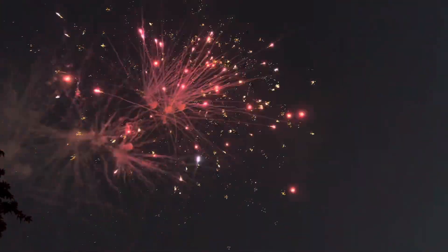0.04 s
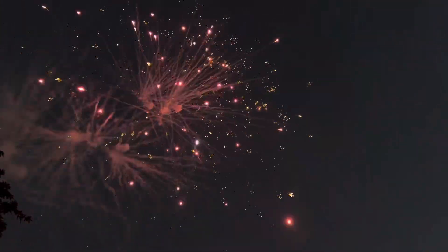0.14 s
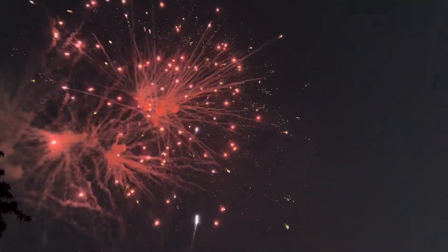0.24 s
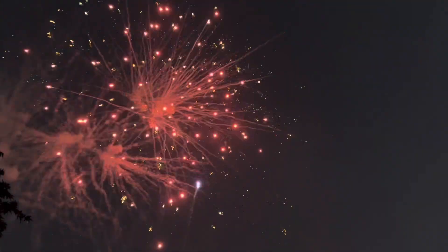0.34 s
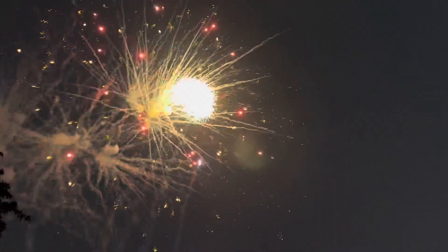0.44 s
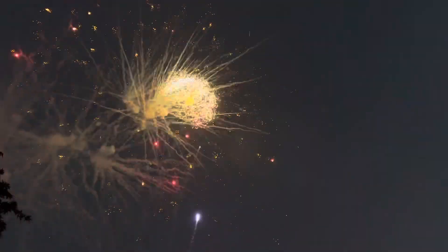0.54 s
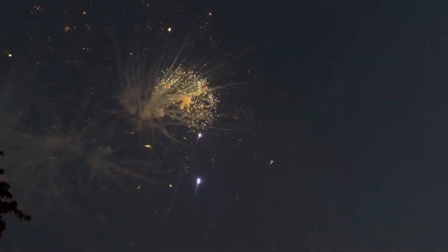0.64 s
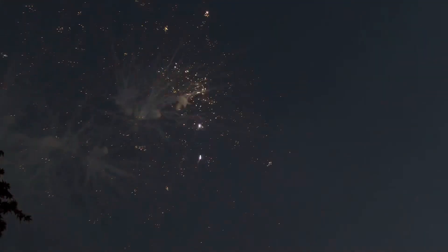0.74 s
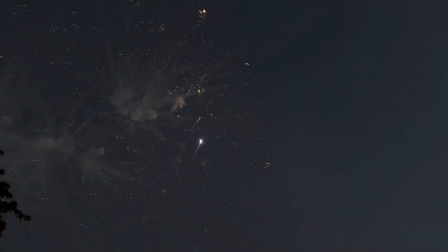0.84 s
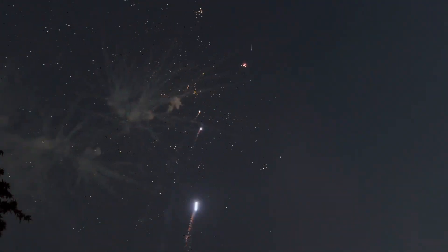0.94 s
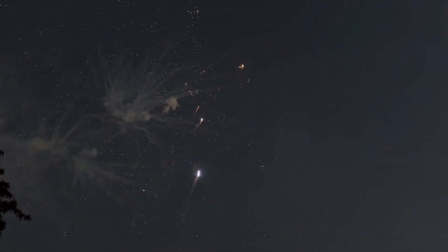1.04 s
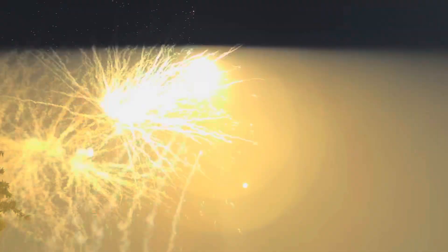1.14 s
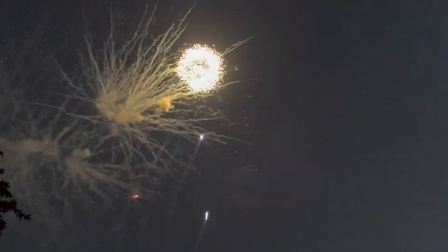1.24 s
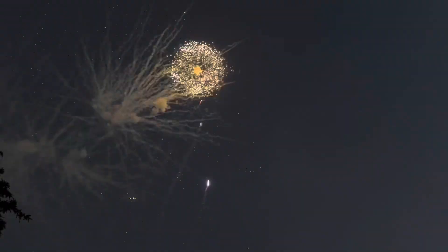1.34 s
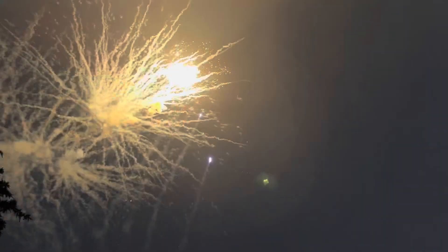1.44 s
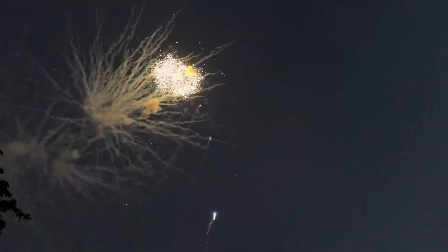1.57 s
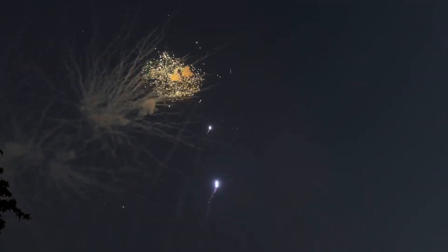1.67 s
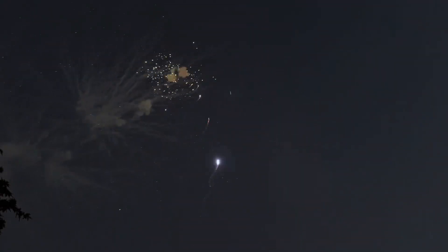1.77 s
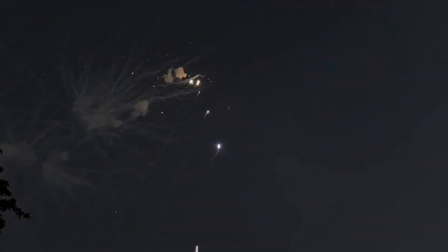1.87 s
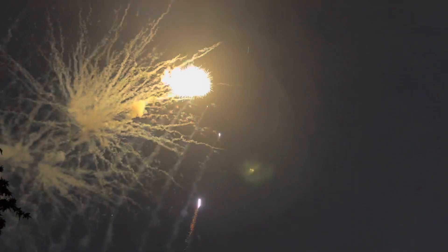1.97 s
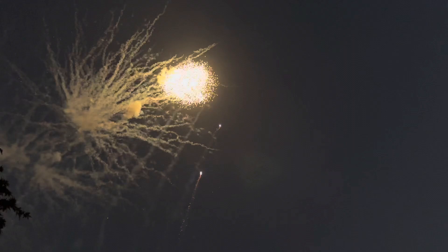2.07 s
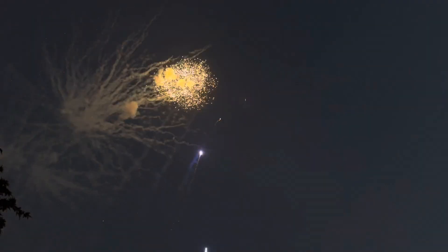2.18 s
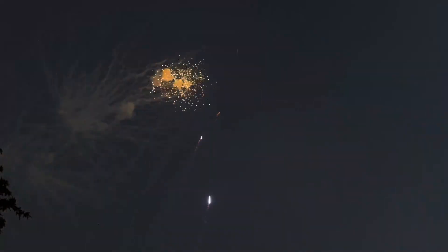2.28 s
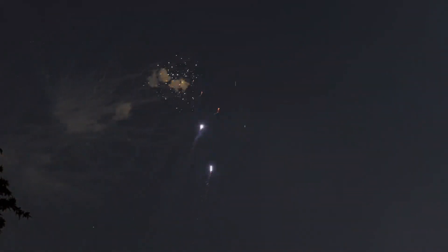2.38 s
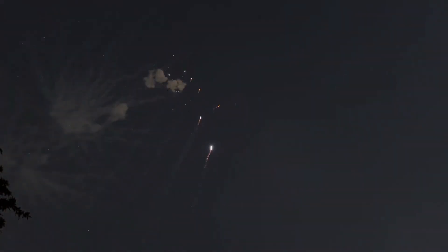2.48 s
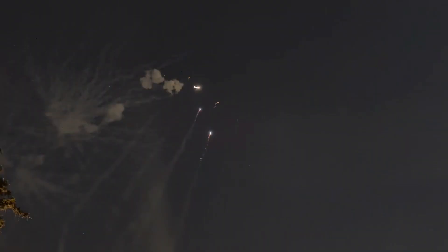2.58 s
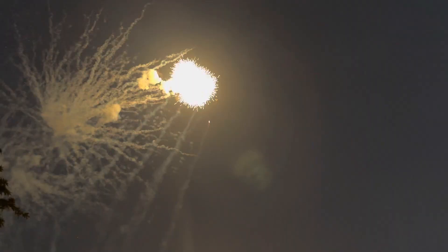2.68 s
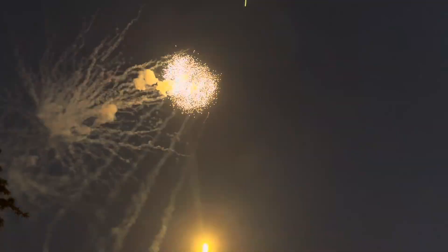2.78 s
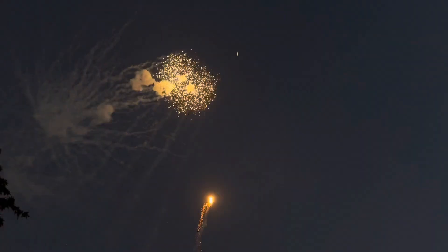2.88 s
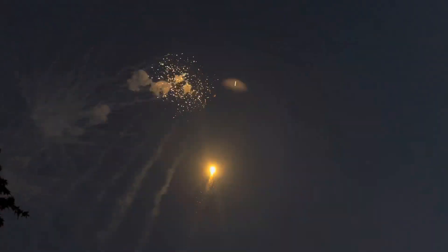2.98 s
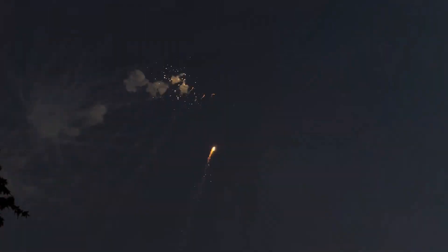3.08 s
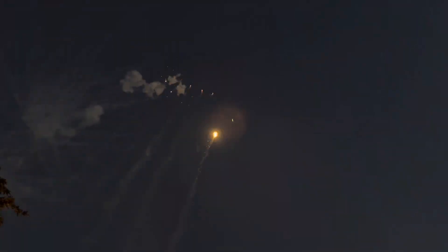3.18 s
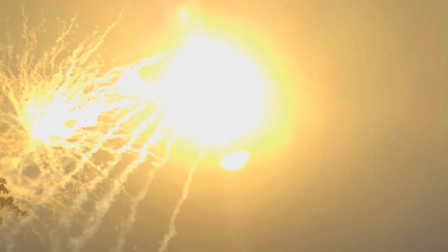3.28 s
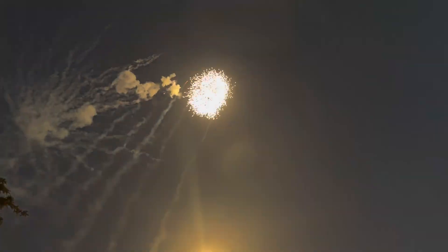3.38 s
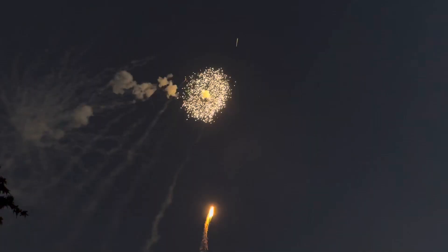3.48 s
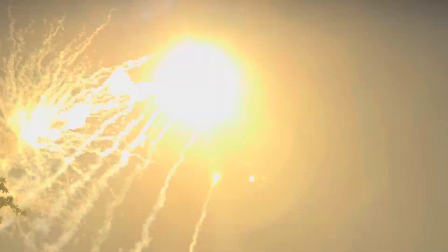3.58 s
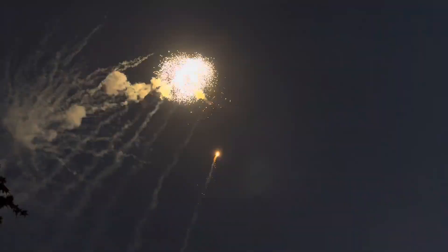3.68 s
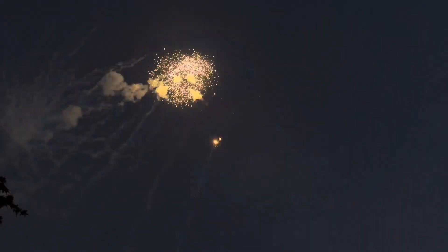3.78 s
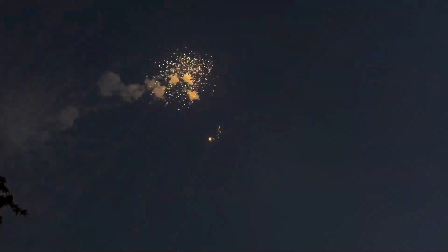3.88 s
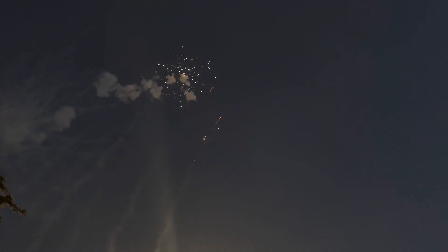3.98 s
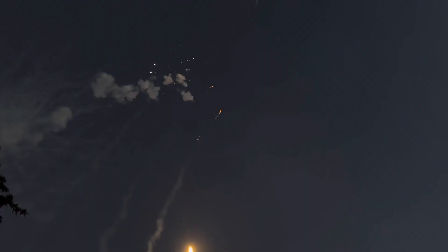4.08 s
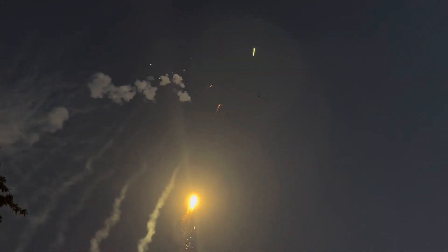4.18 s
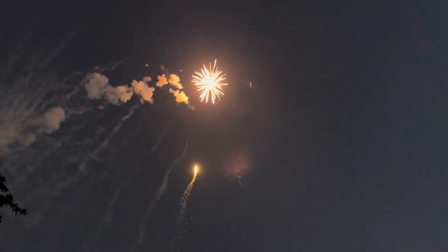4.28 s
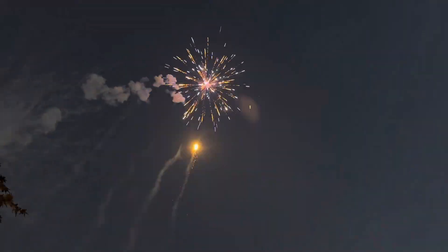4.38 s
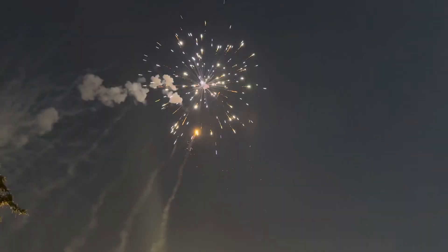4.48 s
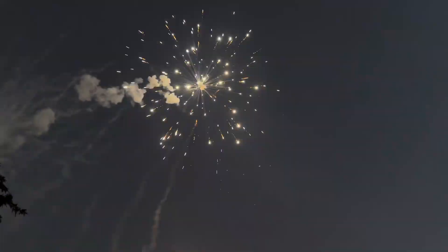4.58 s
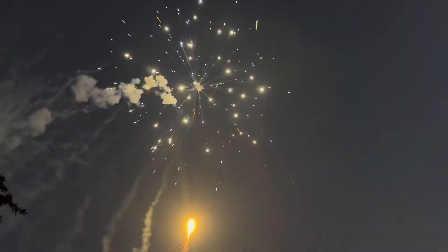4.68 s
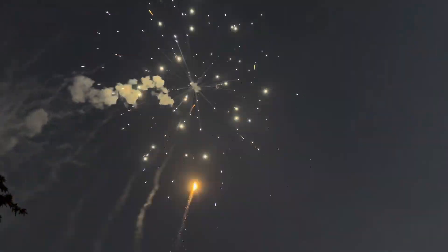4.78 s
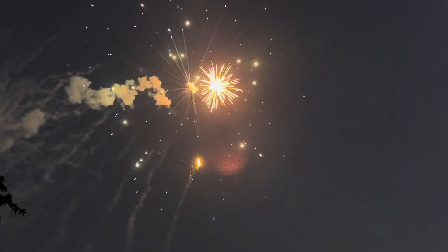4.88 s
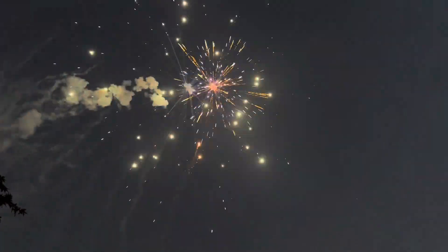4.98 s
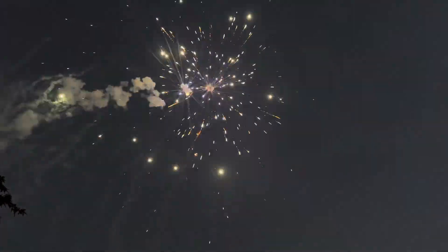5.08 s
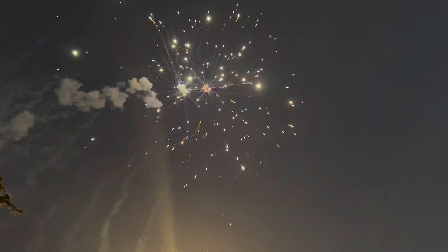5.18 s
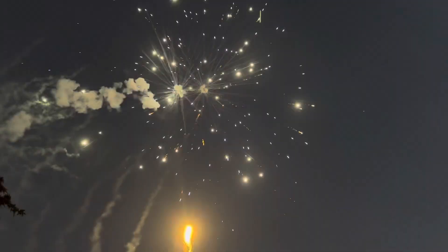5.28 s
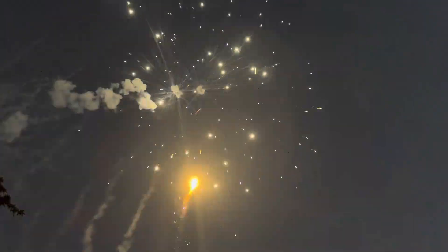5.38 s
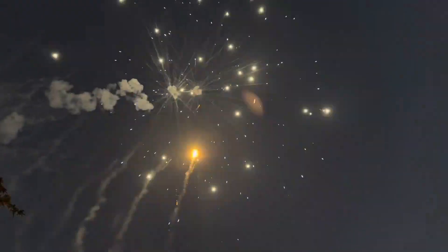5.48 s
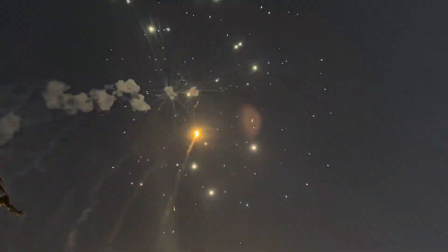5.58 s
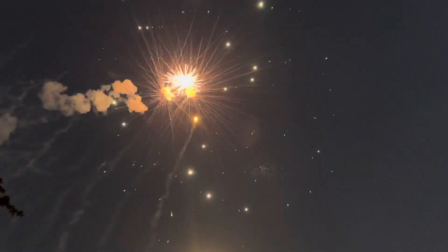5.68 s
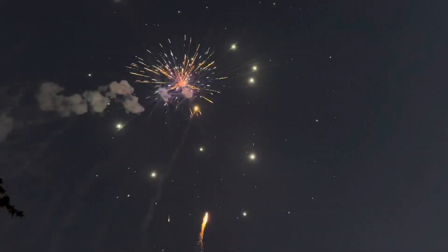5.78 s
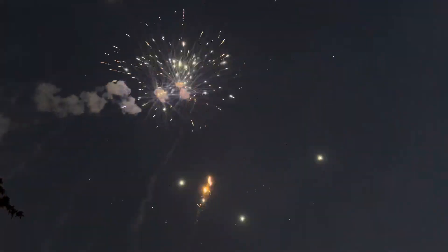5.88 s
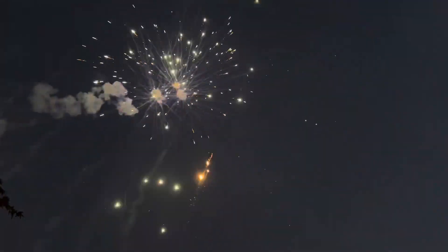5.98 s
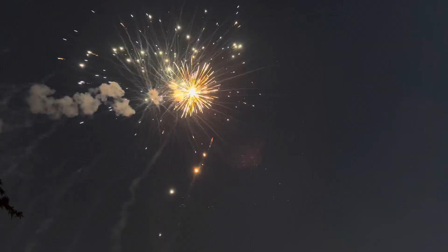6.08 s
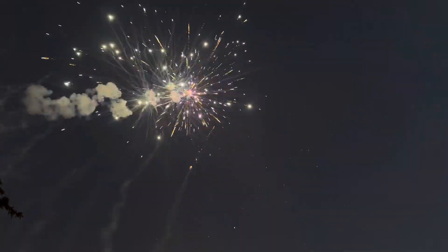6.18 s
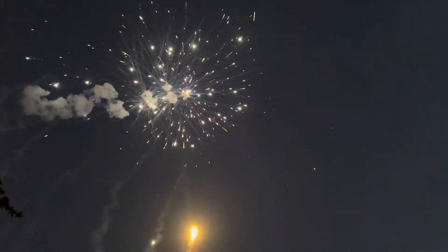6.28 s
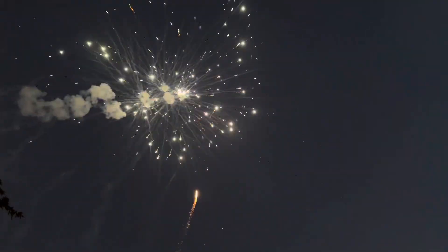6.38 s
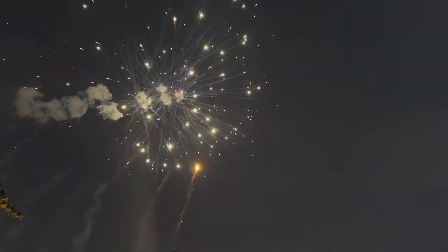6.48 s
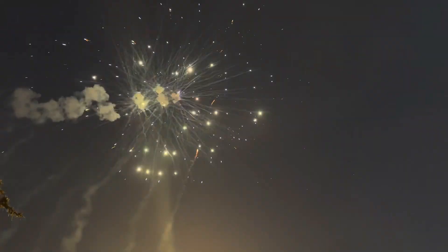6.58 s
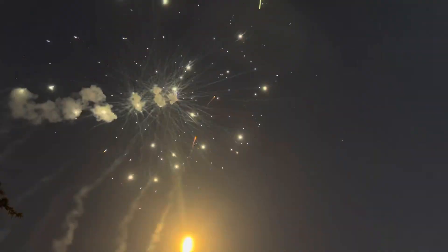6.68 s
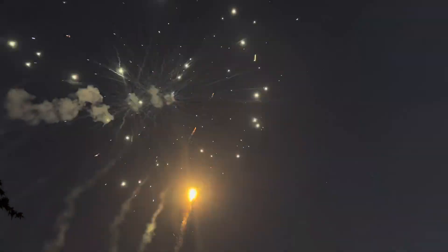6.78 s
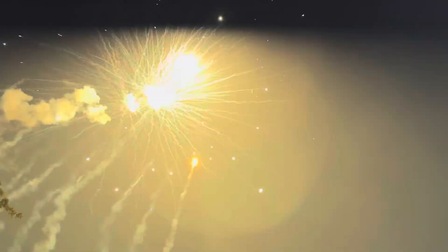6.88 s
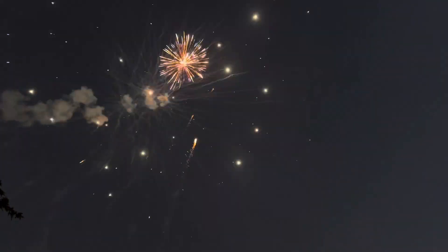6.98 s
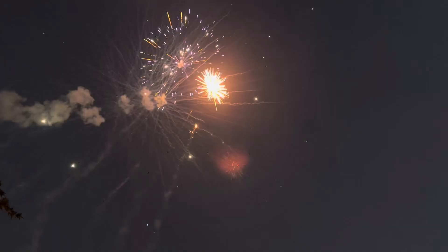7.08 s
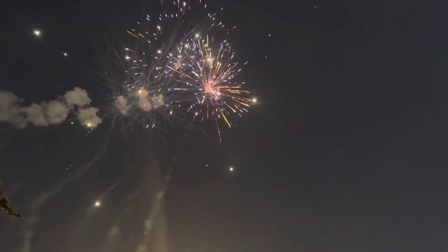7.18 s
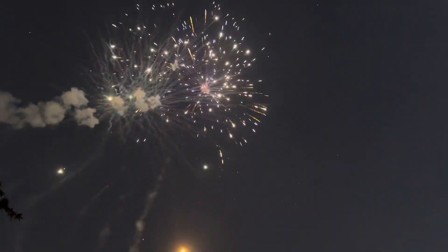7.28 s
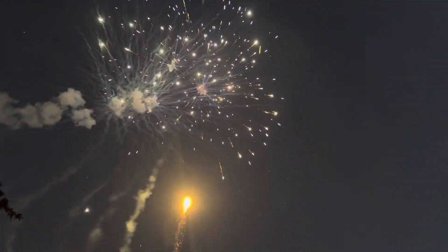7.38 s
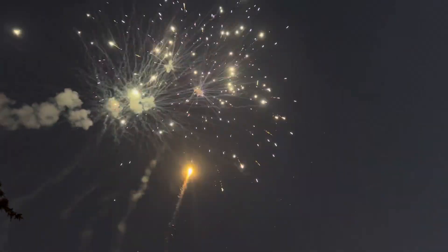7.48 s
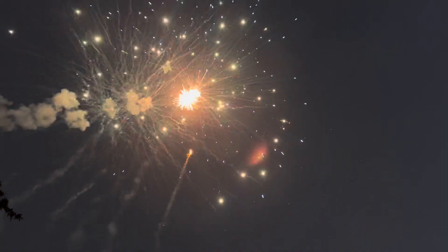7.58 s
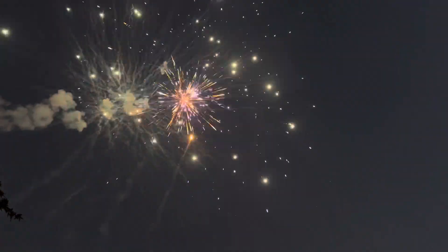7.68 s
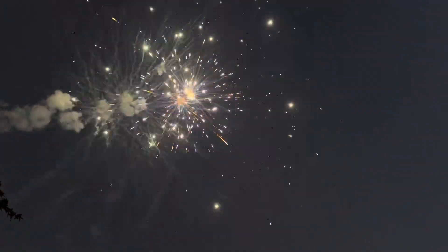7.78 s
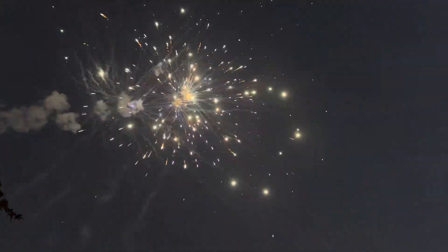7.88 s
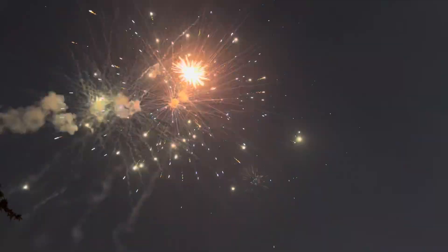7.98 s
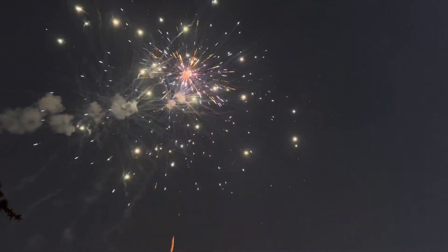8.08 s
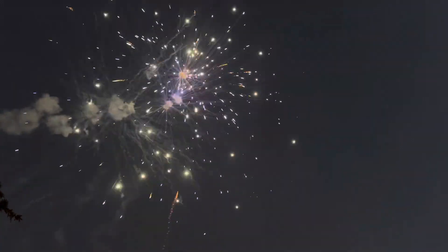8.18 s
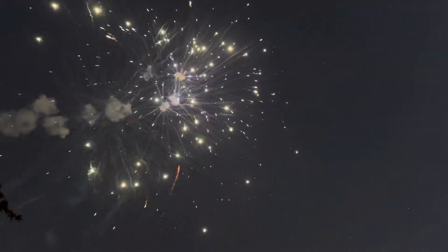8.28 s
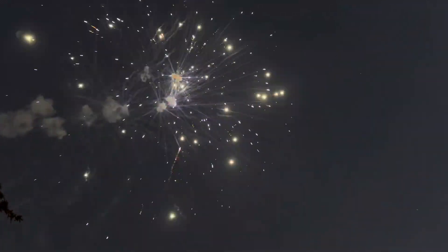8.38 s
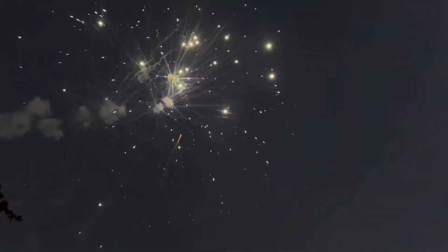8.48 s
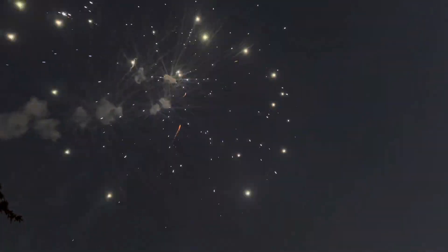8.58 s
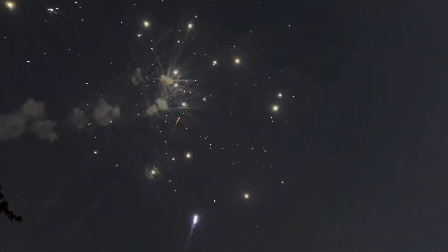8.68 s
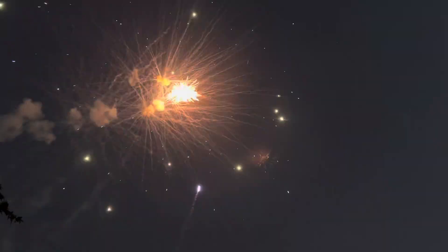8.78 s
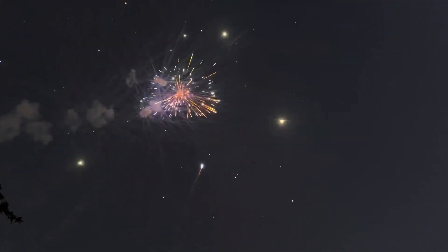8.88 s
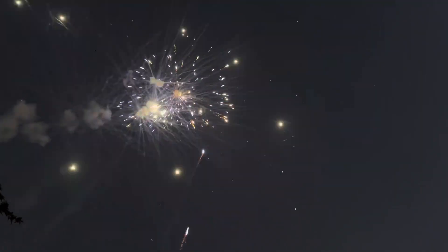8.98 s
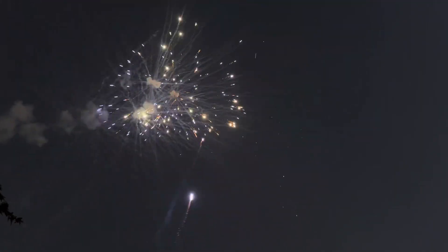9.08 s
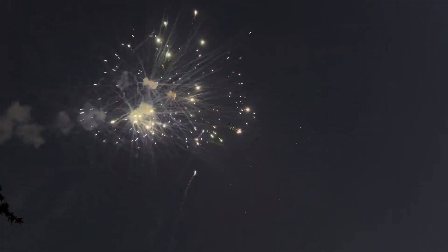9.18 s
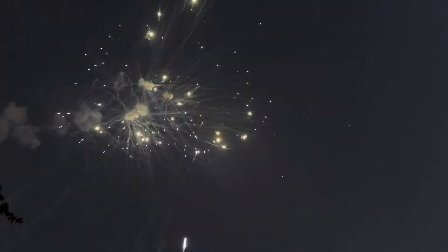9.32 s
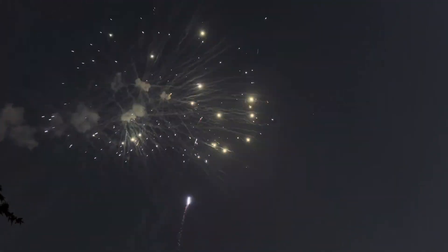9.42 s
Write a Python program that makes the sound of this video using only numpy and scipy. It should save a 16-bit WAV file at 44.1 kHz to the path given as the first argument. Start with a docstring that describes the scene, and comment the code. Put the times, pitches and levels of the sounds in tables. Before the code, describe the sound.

A firework cake fires throughout, outdoors and near a phone microphone. Sharp, ringing launch cracks come from the ground ahead roughly every half second, from the start until about 9.3 seconds. Between them, shells burst overhead and to the left with rounder, raspy booms, doubling up around 0.4, 2.1, 2.8 and 3.7 seconds. A wide cloud of tiny crackles swells after the burst at 0.5 seconds; softer clouds follow from 1.3 to about 4 seconds. The middle stretch is mostly plain cracks and booms, then light crackling returns from 7.7 to about 8.7 seconds. The last boom lands near 8.9 seconds. Faint hollow pops appear around 1.1, 4.8 and 7.6 seconds. Ground and walls throw back quick echoes with a tail of about a second, and each blast is smeared into a slight falling chirp. A faint, steady, low town hum lies underneath.

```python
"""A firework cake fires shell after shell over the murmur of a quiet town, near a phone held up to the sky.
Lift charges crack on the ground ahead, with faint hollow pops between them. The shells boom overhead and
to the left, and some leave a cloud of crackling stars. Ground and walls throw the blasts back.
The phone splits the sound into bands, which smears every blast into a falling chirp."""
import sys
import numpy as np
from scipy import signal
from scipy.fft import rfft, irfft, next_fast_len
from scipy.io import wavfile
from scipy.ndimage import uniform_filter1d

SR = 44100
rng = np.random.default_rng(int(sys.argv[2]) if len(sys.argv) > 2 else 0)


def master_out(mix):
    """Clip the mix to full scale and print it as 16-bit PCM to the path in sys.argv[1]."""
    frames = np.transpose(np.atleast_2d(mix))
    ceiling = np.clip(frames, -1, 1)
    pcm = np.round(ceiling * 32767).astype(np.int16)
    wavfile.write(sys.argv[1], SR, pcm)


N = 416744
SWELL_MS = 2  # room for the hiss that runs ahead of a pressure jump


def gain_of(db):
    """Decibels to gain."""
    return 10 ** (np.asarray(db) / 20)


def curve_at(points, hz):
    """Reads a curve on a log-frequency axis."""
    f, value = np.transpose(points)
    return np.interp(np.log(hz + 1), np.log(f + 1), value)


def diffuse_noise(size, shape):
    """Stereo noise of unit energy, partly alike on both sides; shape(hz, seconds) is its magnitude."""
    # Stereo width. Each row: frequency in Hz, left-right likeness from 0 to 1.
    likeness = [(60, 0.99), (250, 0.74), (600, 0.047), (2000, 0.47), (6000, 0.1), (13000, 0.27)]
    frames, hz = size // 128 + 5, np.fft.rfftfreq(512, 1 / SR)[:, None]
    a, b, c, d = rng.standard_normal((frames, 257, 4)).T
    same, left = np.clip(curve_at(likeness, hz), 0, 1), a + 1j * b
    spectra = np.array([left, same * left + np.sqrt(1 - same ** 2) * (c + 1j * d)])
    spectra *= shape(hz, np.arange(frames) * 128 / SR)
    out = signal.istft(spectra, nperseg=512, noverlap=384)[1][:, :size]
    return out / np.linalg.norm(out, axis=1).mean()


def town_murmur(level_db):
    """The steady, low bed of the town at night."""
    # Tone of the murmur. Each row: frequency in Hz, relative level in dB.
    spectrum = [(18, -40), (30, -7), (82, 2), (333, -2), (397, 3), (978, -6), (1230, -13.5), (5250, -20),
                (12000, -36.5), (15600, -77), (22000, -120)]
    return gain_of(level_db) * np.sqrt(N) * diffuse_noise(N, lambda hz, s: gain_of(curve_at(spectrum, hz)))


def blast(push_ms, soft_ms):
    """A pressure jump, its fall and the suction behind it; the air rounds the jump."""
    ms = np.arange(1500) / SR * 1000
    pole = np.exp(-1000 / (SR * soft_ms))
    return signal.lfilter([1 - pole], [1, -pole], (1 - ms / push_ms) * np.exp(-ms / push_ms))


def crack(ring, ragged_db, front_ms, rise_ms, fall_ms, bright):
    """Ragged gas noise that swells up to the jump and dies after it, plus what the jump sets ringing."""
    t = np.arange(1500) / SR - front_ms / 1000
    envelope = np.exp(np.where(t < 0, 1000 * t / rise_ms, -1000 * t / fall_ms))
    out = gain_of(ragged_db) * envelope * signal.lfilter([1, -bright], 1, rng.standard_normal(len(t)))
    for hz, db, t60 in ring:
        phase = 2 * np.pi * hz * (1 + 0.067 * rng.standard_normal()) * t
        ring_db = db + 1.7 * rng.standard_normal() - 60 * np.maximum(t, 0) / t60
        out += (t >= 0) * gain_of(ring_db) * np.sin(phase)
    return out


def reverb_tail(near_db, far_db, slaps_db, bass_hz, rise_ms=6.74):
    """Lumpy returns from near walls, too small to throw back deep bass, and smooth ones from far off."""
    # Decay of near walls and of the wider neighbourhood. Each row: frequency in Hz, t60 in seconds.
    near_t60 = [(60, 0.43), (160, 0.12), (420, 0.19), (1100, 0.23), (3000, 0.28), (8000, 0.27),
                (15000, 0.15)]
    far_t60 = [(60, 1.6), (200, 0.73), (600, 1.09), (2000, 1.03), (6000, 0.86), (15000, 0.53)]
    t = np.arange(SR) / SR
    near = diffuse_noise(
        SR, lambda hz, s: gain_of(-60 * s / curve_at(near_t60, hz)) * hz ** 2 / (hz ** 2 + bass_hz ** 2))
    far = diffuse_noise(SR, lambda hz, s: gain_of(-60 * s / curve_at(far_t60, hz)))
    lumps = uniform_filter1d(uniform_filter1d(rng.standard_normal(SR), size=90), size=90)
    near *= gain_of(slaps_db * lumps / lumps.std())
    return (gain_of(near_db) * near + gain_of(far_db) * far) * (1 - np.exp(-1000 * t / rise_ms)) ** 2


def shots(rows, echoes, tails, snap, right_late_ms, front_ms, soft_ms, dull_db, spike_db, scatter, smear):
    """Blasts with slap echoes; successive shots take turns among the tails to vary the ring-out."""
    preroll = SR // 2
    size, front = next_fast_len(N + preroll + SR), round((front_ms + SWELL_MS) * SR / 1000)
    out, sends = np.zeros((2, size)), np.zeros((len(tails), 1, size))
    for k, (s, blast_db, crack_db, push_ms, wet_db) in enumerate(rows):
        push = gain_of(blast_db) * blast(push_ms, soft_ms)
        low = np.r_[np.zeros(front), push[:-front]]
        shared, *own = (snap(front_ms + SWELL_MS) for _ in range(3))
        high = gain_of(crack_db) * (shared + np.array(own))  # each microphone port hears its own crack
        echo = uniform_filter1d(low, size=smear) + gain_of(dull_db) * high  # rough walls scatter treble
        at = round((s - SWELL_MS / 1000) * SR) + preroll
        stretches = 1 + scatter * rng.standard_normal(len(echoes) + 1)
        for (delay_ms, *side_db), stretch in zip([(0, 0, 0)] + echoes, stretches):
            wave = echo if delay_ms > 3 else low + high
            for ear in range(2):
                start = at + max(round((delay_ms * stretch + ear * right_late_ms) * SR / 1000), 0)
                out[ear, start:start + len(low)] += gain_of(side_db[ear]) * wave[ear]
        send = sends[k % len(tails), 0]
        send[at:at + len(low)] += gain_of(wet_db) * low
        send[at + front] += gain_of(wet_db + crack_db + spike_db)  # the crack, smeared into even treble
    out += irfft((rfft(sends) * rfft(tails, size)).sum(0), size)
    return out[:, preroll:preroll + N]


def lift_charges(tails, push_ms=0.81, wet_db=1.58):
    """Charges on the ground launch the shells with a sharp, ringing crack."""
    # Launches, the first just before the start. Each row: start in seconds, blast and crack levels in dB.
    launches = [(-0.08, -3.5, -16), (0.2396, -0.5, -12.5), (0.6071, -7.5, -11), (0.9132, -1.5, -12),
                (1.2257, -3, -12.5), (1.948, -2, -11), (2.5276, -3.5, -11.5), (3.163, -2.5, -12.5),
                (3.8482, -4.5, -13.5), (4.3943, -1, -12.5), (5.0485, -5.5, -10), (5.4876, -5, -10.5),
                (5.9822, -4.5, -11), (6.4234, -4, -9.5), (7.0436, -2.5, -11.5), (7.8284, -0.5, -11.5),
                (8.3314, -2, -12), (8.662, -4, -11), (9.0121, -3.5, -11.5), (9.3063, -1, -12)]
    # Ring of the crack. Each row: pitch in Hz, level in dB, t60 in seconds.
    ring = [(2570, -17.5, 0.013), (4130, -6, 0.0093), (6560, -14, 0.016), (8570, -3.5, 0.0058)]
    # Slap echoes. Each row: delay in ms, left and right levels in dB.
    echoes = [(0.978, -7, -7.5), (1.878, -14, -10), (11.34, -12.5, -13.5), (13, -16, -11.5),
              (20.53, -5, -4.5), (21.49, -10, -10.5), (23.55, -8.5, -11.5), (32.1, -28, -21.5),
              (37, -15.5, -21), (43.94, -20.5, -21)]
    rows = [(s, blast_db, crack_db, push_ms, wet_db) for s, blast_db, crack_db in launches]
    return shots(rows, echoes, tails,
                 lambda front_ms: crack(ring, 0.17, front_ms, rise_ms=1.0, fall_ms=0.95, bright=0.44),
                 right_late_ms=0.014, front_ms=0.9, soft_ms=0.011,
                 dull_db=-21.5, spike_db=11.5, scatter=0.0066, smear=3)


def hollow_pops(tail, wet_db, ring_cycles=5.6, upper_hz=2200):
    """Each faint pop is a click, a few hollow cycles at its own pitch and a brief higher ring."""
    # Pops between the shots. Each row: start in seconds, ring level in dB, pitch in Hz, click level in dB.
    pops = [(0.2193, -27.5, 1500, -38), (1.116, -24.5, 880, -52), (1.148, -45, 1160, -37),
            (4.74, -39, 1300, -58), (4.790, -27.5, 750, -51.5), (4.892, -40, 950, -68),
            (6.687, -34, 1150, -54), (7.5785, -36, 900, -58.5), (7.627, -20.5, 750, -52),
            (7.653, -21, 620, -45), (7.665, -25, 153, -50), (8.5747, -31, 1000, -35)]
    dry = np.zeros(N + SR)
    for s, level_db, hz, click_db in pops:
        ring = [(hz, level_db, ring_cycles / hz), (upper_hz, level_db - 6, 0.004)]
        pop = crack(ring, click_db, SWELL_MS, rise_ms=0.3, fall_ms=1.2, bright=0.2)
        at = round((s - SWELL_MS / 1000) * SR)
        dry[at:at + len(pop)] += pop
    return dry[:N] + gain_of(wet_db) * signal.oaconvolve(dry[None], tail, axes=1)[:, :N]


def shell_bursts(tails, crack_db=-21.5):
    """Shells explode overhead and to the left: a rounder boom with a longer rasp of gas."""
    # Bursts. Each row: start in seconds, blast level in dB, push length in ms, reverb send in dB.
    bursts = [(0.37, 2.1, 0.71, -3.5), (0.387, -2.5, 0.64, -18.5), (0.5488, 4, 1.1, -0.4),
              (1.3258, 4, 1.2, -1), (1.6106, 1.5, 1.08, 2.1), (2.118, 3, 1.07, 0.9),
              (2.1398, 2.5, 1.27, -6.5), (2.802, 4, 0.93, -1), (2.828, 3, 1.16, -6),
              (3.4456, 2.5, 1.18, -0.5), (3.7373, 4, 1, -2), (3.7649, 3.5, 1.14, -3),
              (4.4124, 3.5, 0.81, -7.5), (5.007, 4.5, 0.77, -6), (5.8283, 3, 0.91, -5.5),
              (6.1886, 3.5, 0.91, -4.3), (7.0932, 2, 0.84, -5.5), (7.21, 3.5, 0.88, -4),
              (7.7217, 3, 0.87, -2.5), (8.1009, 2.5, 0.91, -1.5), (8.9156, 3, 0.94, -4)]
    # Slaps off ground and walls. Each row: delay in ms, left and right levels in dB.
    echoes = [(1.1, -21, -21), (3.42, -56, -7), (7.54, -3, -7), (9.25, -12.5, -5.5), (14.4, -9, -10),
              (22.05, -27, -10.5), (28.24, -17, -22), (35.7, -22, -20), (48.6, -25, -18.5)]
    rows = [(s, blast_db, crack_db, push_ms, wet_db) for s, blast_db, push_ms, wet_db in bursts]
    return shots(rows, echoes, tails,
                 lambda front_ms: crack([], 2.7, front_ms, rise_ms=1.0, fall_ms=3.6, bright=0.067),
                 right_late_ms=0.24, front_ms=0.94, soft_ms=0.037,
                 dull_db=-3, spike_db=26.5, scatter=0.013, smear=11)


def crackling_stars(per_s, spread_db, push_ms, peak_after_s):
    """Thousands of tiny snaps all over the sky, a few of them larger; each cloud swells and dies away."""
    # Clouds of stars. Each row: start in seconds, level at the top of the swell in dB.
    clouds = [(.55, -40.5), (1.329, -53.5), (1.61, -64), (2.12, -54.5), (2.8, -52), (3.45, -56.5),
              (7.72, -50), (8.1, -57)]
    strength = gain_of(spread_db * np.minimum(rng.exponential(1, (N, 2)).T, 4))
    hits = strength * (rng.random((N, 2)).T < per_s / SR)
    snap = blast(push_ms, soft_ms=0.015)[None, :200]
    snaps = signal.oaconvolve(hits + 0.047 * hits[::-1], snap, axes=1)[:, :N]
    level = np.zeros(N)
    for s, top_db in clouds:
        age = np.maximum(np.arange(N) / SR - s, 0) / peak_after_s
        level += gain_of(top_db) * age * np.exp(1 - age)
    return level * snaps / snaps.std()


def scene():
    """Mixes the fireworks over the town; the reverb of a burst overhead holds less bass."""
    ground = np.array([reverb_tail(near_db=2.5, far_db=-11, slaps_db=1.5, bass_hz=60) for _ in range(2)])
    sky = np.array([reverb_tail(near_db=0.5, far_db=-8, slaps_db=3.5, bass_hz=170) for _ in range(3)])
    return (lift_charges(ground) + shell_bursts(sky) + hollow_pops(ground[0], wet_db=-4.5)
            + crackling_stars(per_s=2200, spread_db=3, push_ms=0.14, peak_after_s=0.23)
            + town_murmur(level_db=-56.5))


def record(dry):
    """The phone: microphone colour, rumble filter, band splitting, soft ceiling, band limit."""
    # Microphone colour. Each row: frequency in Hz, gain in dB.
    mic_eq = [(30, 4.5), (60, 9), (150, 3), (230, 6), (320, 5), (410, 5), (520, 1), (1200, 3), (1600, 2.5),
              (2700, 2), (4200, -1), (5400, -2.5), (6400, -1), (7500, -6.5), (9200, -2.5), (10200, -8.5),
              (10800, -26.5), (12200, -18), (13000, -10), (15400, -8.5), (16300, -23.5)]
    # The phone's band splits, each a frequency in Hz.
    crossovers = [81, 169, 303, 921, 4012]
    rumble_hz, top_hz, ceiling = 41, 16500, 1.2
    size, damping = 16384, np.sqrt(2)
    log_gain = np.log(gain_of(curve_at(mic_eq, abs(np.fft.fftfreq(size, 1 / SR)))))
    colour = np.exp(log_gain - 1j * signal.hilbert(log_gain).imag)[:size // 2 + 1]  # minimum phase
    hz = np.fft.rfftfreq(size, 1 / SR)
    s = 1j * hz / rumble_hz
    colour *= s * s / (s * s + damping * s + 1)
    for split_hz in crossovers:  # each split turns the phase once round: the bass arrives late
        s = 1j * hz / split_hz
        colour *= (s * s - damping * s + 1) / (s * s + damping * s + 1)
    x = signal.oaconvolve(dry, irfft(colour)[None, :size // 2], axes=1)[:, :N]
    x = ceiling * np.tanh(x / ceiling)
    return signal.oaconvolve(x, signal.firwin(511, top_hz, window=("kaiser", 9), fs=SR)[None], "same")


dry = scene()
out = record(dry)
master_out(out)
```